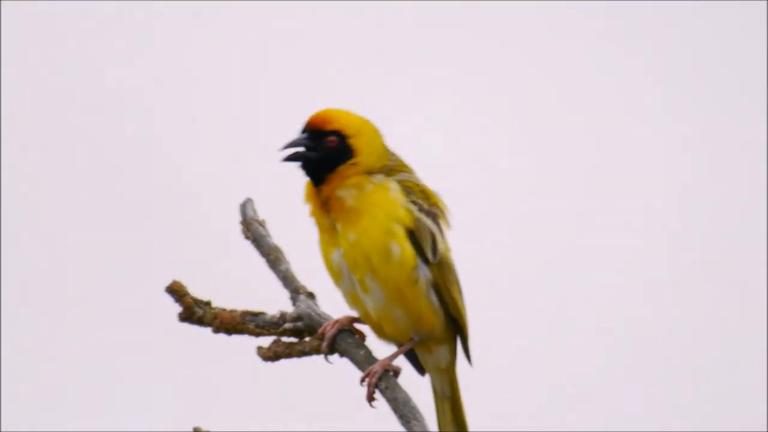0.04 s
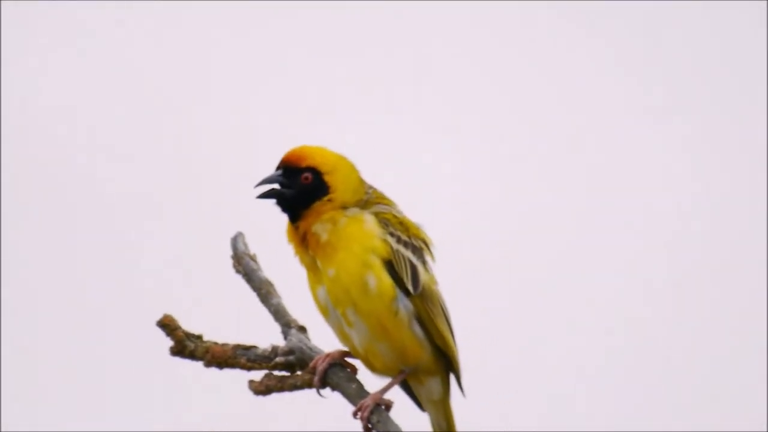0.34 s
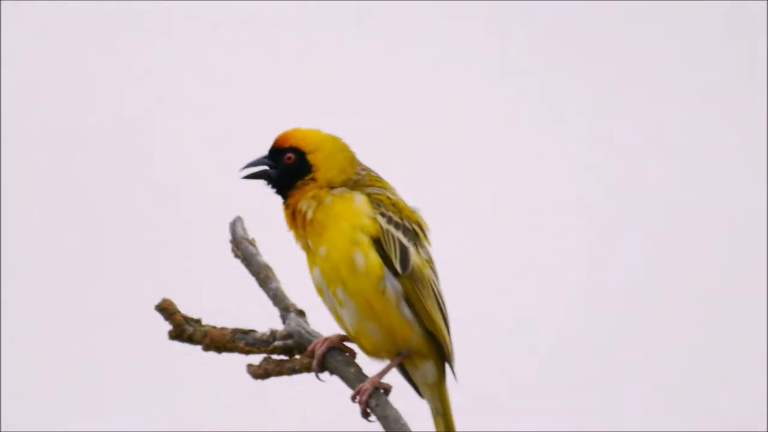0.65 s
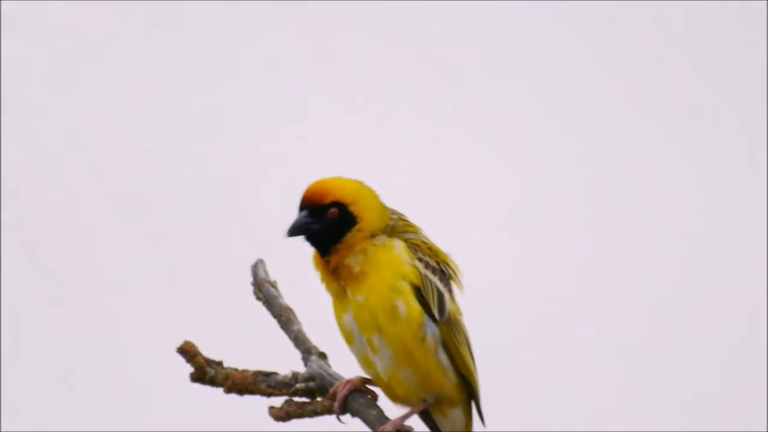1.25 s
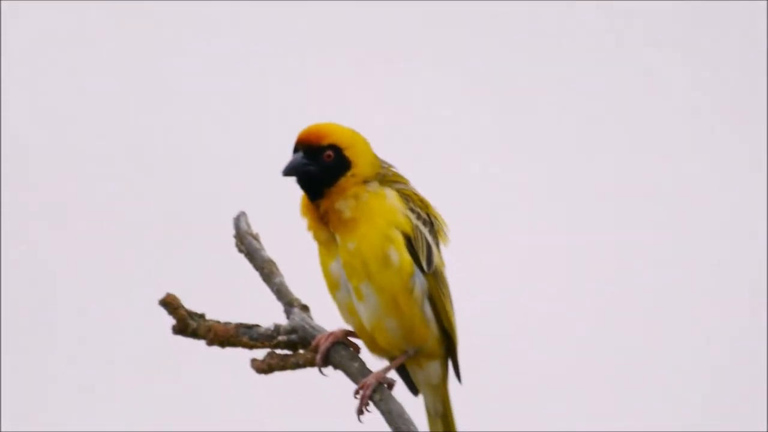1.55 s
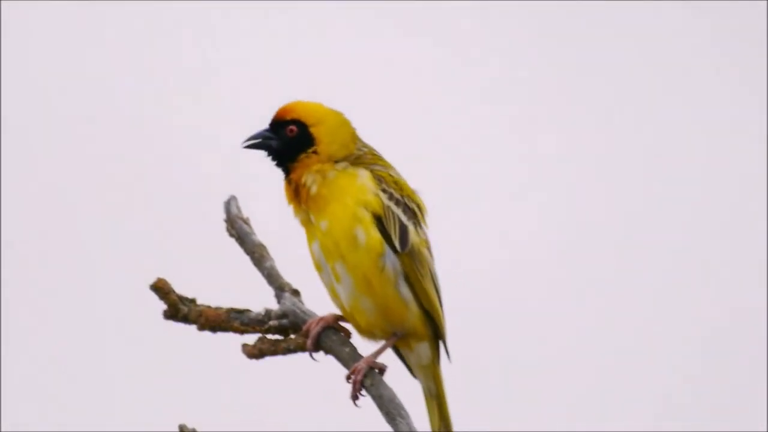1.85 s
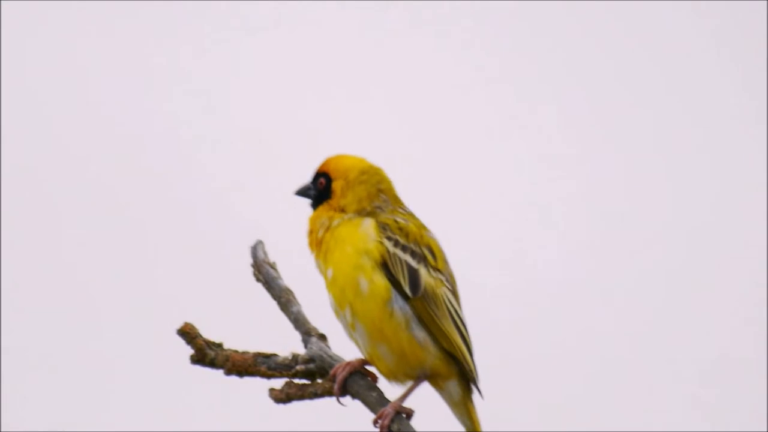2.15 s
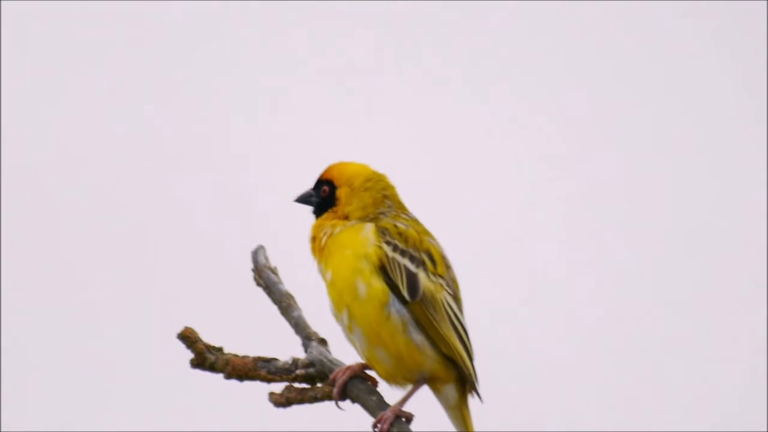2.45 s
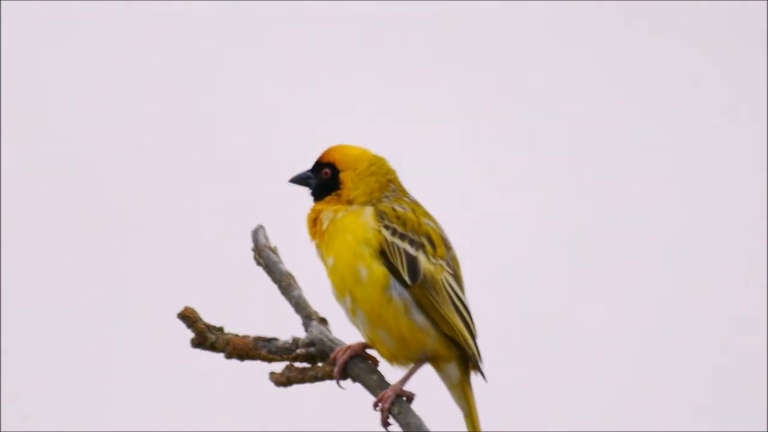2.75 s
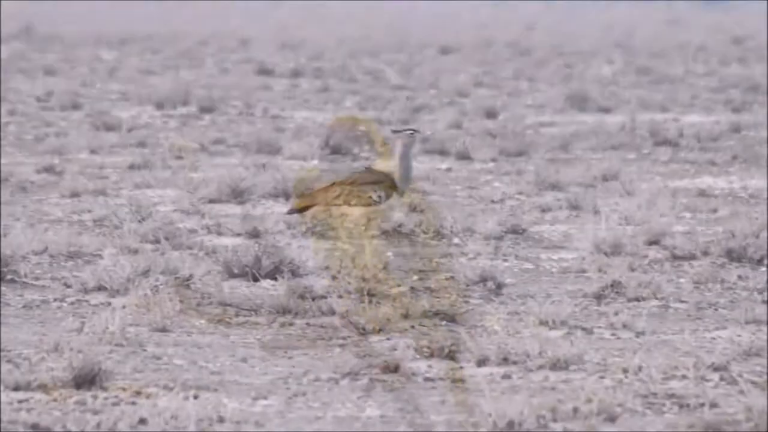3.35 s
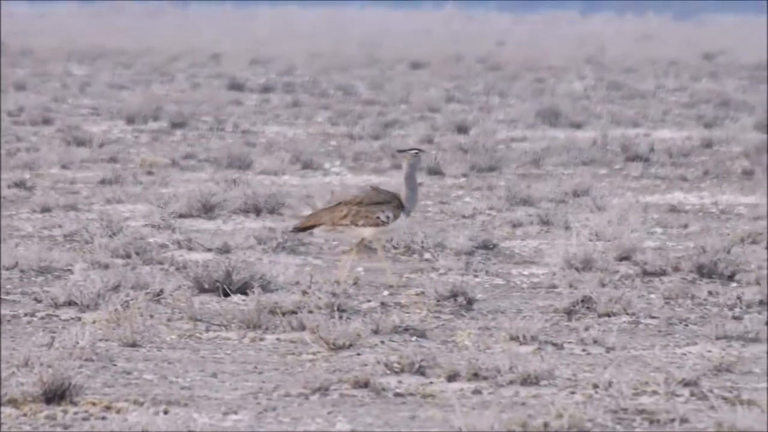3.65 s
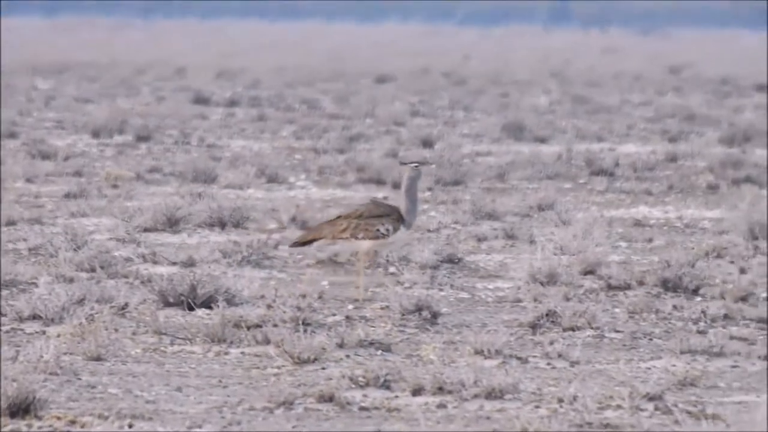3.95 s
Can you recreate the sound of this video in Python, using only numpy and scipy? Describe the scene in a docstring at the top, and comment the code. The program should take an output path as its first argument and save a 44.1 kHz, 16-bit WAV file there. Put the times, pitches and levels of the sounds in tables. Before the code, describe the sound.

Buzzy bird chatter gives way to dry ticks, with rumbling wind and faint distant whistles.

```python
"""On a bare branch in the wind, a small bird gives a fast buzzy chatter, then dry ticks in pairs.
Its rapid pitch sweeps and noise bursts ring in the throat and beak and scatter off ground and bushes.
The wind is a low, gusting rumble under a thin hiss. Further off, a second bird whistles three times
in nearly pure tones, with faint peeps. Near the end the scene cuts to a much quieter plain with a hum."""
import sys
import numpy as np
from scipy import signal
from scipy.fft import rfft, irfft
from scipy.io import wavfile
from scipy.ndimage import uniform_filter1d

SR = 44100
rng = np.random.default_rng(int(sys.argv[2]) if len(sys.argv) > 2 else 0)


def put_to_file(sound):
    """Save the sound as 16-bit audio at rate SR, in the file named by the first command-line argument."""
    columns = np.atleast_2d(sound).T  # one column per channel
    safe = np.clip(columns, -1, 1)
    whole_steps = np.round(safe * 32767)
    wavfile.write(sys.argv[1], SR, whole_steps.astype(np.int16))


N = 176400
TIME = np.arange(N) / SR
HZ = np.fft.rfftfreq(N, 1 / SR)
OCTAVE_DB = -21.5  # second harmonic of a sweep, relative to its fundamental


def amp(db):
    """Decibels to amplitude ratio."""
    return 10 ** (np.asarray(db) / 20)


def unit(x):
    """Normalisation to an rms of 1."""
    return x / np.sqrt(np.mean(x ** 2) + 1e-20)


def spectrum(points, hz):
    """Interpolation of a table on a log-frequency axis."""
    f, value = np.transpose(points)
    return np.interp(np.log(hz + 1), np.log(f + 1), value)


def curve(points, column=1):
    """Linear interpolation of a table along time."""
    rows = np.array(points)
    return np.interp(TIME, rows[:, 0], rows[:, column])


def add(mix, start_s, sound):
    """Superposition: a sound adds to the mix from start_s on."""
    at = round(start_s * SR)
    if at >= 0:
        part = mix[at:at + len(sound)]
        part += sound[:len(part)]


def panned(x, db):
    """Interaural level difference: the left rises and the right falls by db."""
    return x * np.array([amp(db), amp(-db)]).reshape(2, -1)


def filtered(x, colour):
    """Linear filtering: the spectrum of x is multiplied by a gain curve."""
    return irfft(rfft(x) * amp(spectrum(colour, HZ)), N)


def air(colour, coherence, patchy_db, flicker_db, size=1024):
    """Partially coherent stereo noise, with drifting spectral patches and a flicker common to all bands."""
    hz = np.fft.rfftfreq(size, 1 / SR)
    hop = size // 4
    a, b, c, d, patch = rng.standard_normal((5, N // hop + 6, len(hz)))
    patch = unit(uniform_filter1d(uniform_filter1d(patch, size=8, axis=0), size=8, axis=1))
    shared = np.clip(spectrum(coherence, hz), 0, .99)
    left = a + 1j * b
    right = shared * left + np.sqrt(1 - shared ** 2) * (c + 1j * d)
    frames = np.array([left, right]) * amp(patchy_db * patch)
    noise = signal.istft(frames.transpose(0, 2, 1), nperseg=size, noverlap=size - hop)[1][:, :N]
    flicker = unit(uniform_filter1d(uniform_filter1d(rng.standard_normal(N), size=700), size=400))
    return unit(filtered(noise * amp(flicker_db * flicker), colour))


def wind():
    """Amplitude-modulated noise in three bands: deep buffeting, a gusting rumble and a steadier rush."""
    # wind spectrum: (frequency [Hz], relative level [dB])
    colour = [(15, -64.5), (25, -32.5), (107, -3), (166, 0.5), (277, -7), (456, -23.5), (595, -23),
              (694, -27.5), (1060, -32), (1430, -44.5), (1840, -45), (2400, -62), (3120, -88), (5280, -120)]
    # likeness of the two channels: (frequency [Hz], coherence [0-1])
    coherence = [(25, 0.48), (70, 0.34), (180, 0.62), (550, 0.53), (1650, 0.37), (15000, .33)]
    # envelopes of the three bands: (time [s], level [dB])
    buffet_level = [(0.04, -35), (0.25, -54), (0.27, -37), (0.47, -49), (0.54, -40.5), (0.88, -48),
                    (0.89, -44), (2.0, -39.5), (2.02, -27.5), (2.05, -43.5), (2.5, -40), (3.25, -40),
                    (3.32, -36.5), (3.37, -45)]
    rumble_level = [(0.04, -33.5), (0.71, -34.5), (0.73, -29), (0.85, -34), (1.28, -29), (1.89, -32.5),
                    (2.01, -27.5), (2.05, -32), (2.09, -28.5), (2.7, -36), (2.72, -38.5), (3.17, -36),
                    (3.2, -31), (3.27, -37.5), (3.37, -31.5)]
    rush_level = [(0.05, -50), (.6, -52.5), (2.2, -53), (2.9, -52.5), (3.4, -52.5)]
    # side the rumble leans to: (time [s], left minus right [dB])
    balance = [(0.02, 6), (1.22, 2), (1.25, -4), (1.4, 5.5), (1.83, -8.5), (2.41, 7.5), (2.45, 3.5),
               (2.96, 10), (3.39, 7.5)]
    buffet_below_hz, rush_above_hz = 121.2, 479
    bins = rfft(air(colour, coherence, patchy_db=1.0, flicker_db=1.0))
    deep = 1 / (1 + (HZ / buffet_below_hz) ** 8)
    low = 1 / (1 + (HZ / rush_above_hz) ** 6)
    buffet = unit(irfft(bins * deep, N)) * amp(curve(buffet_level) + .5)
    rumble = unit(irfft(bins * (low - deep), N)) * amp(curve(rumble_level))
    rush = unit(irfft(bins * (1 - low), N)) * amp(curve(rush_level))
    lean_db = curve(balance) / 2
    return panned(buffet, .4 * lean_db) + panned(rumble, lean_db) + panned(rush, db=.9)


def hiss():
    """The thin treble of the wind: broadband noise whose low coherence makes it sound wide."""
    # hiss spectrum: (frequency [Hz], relative level [dB])
    colour = [(1200, -23), (2000, 4.5), (3500, 5.5), (4400, 1.5), (6000, -1), (10000, -0.5), (16000, -4.5)]
    # hiss envelope: (time [s], level [dB])
    level = [(0, -69.5), (2, -69.5), (2.8, -72.5), (3.05, -70), (3.4, -68)]
    return air(colour, coherence=[(2000, .14), (12000, .13)], patchy_db=1.2, flicker_db=.63) * amp(curve(level))


def sweep(mid_s, length_s, from_hz, to_hz, db, bend=1, soft=1.27, wobble=.042, octave_db=OCTAVE_DB):
    """Frequency modulation: an unsteady glide, fastest at first if bend < 1. Returns (start, sound)."""
    progress = np.linspace(0, 1, max(int(length_s * SR), 8))
    waver = unit(uniform_filter1d(rng.standard_normal(SR // 4), size=24))[:len(progress)]
    hz = from_hz * (to_hz / from_hz) ** (progress ** bend) * (1 + wobble * waver)
    phase = 2 * np.pi * (np.cumsum(hz) / SR + rng.random())
    tone = np.sin(phase) + amp(octave_db) * np.sin(2 * phase) * (2 * hz < SR / 2)
    envelope = abs(np.sin(np.pi * progress)) ** soft
    return mid_s - length_s / 2, amp(db) * envelope * tone


def chatter():
    """Pulses too fast to resolve fuse into a buzz around each syllable's up-sweep and down-sweep."""
    # down-sweep of each syllable: (time [s], level [dB], final pitch [Hz])
    syllables = [(0.0215, -46, 5190), (.069, -47, 5200), (0.1161, -48, 5200), (.1632, -48, 5200),
                 (.2102, -48, 5220), (0.2574, -48, 5100), (0.3052, -49, 5050), (0.3526, -48.5, 5010),
                 (0.401, -49.5, 5010), (0.4504, -50.5, 4840), (0.5003, -51.5, 4410), (0.551, -52.5, 4240),
                 (.604, -52.5, 4160), (.657, -53, 4010), (0.7103, -53.5, 4000), (.766, -56, 4100),
                 (.8093, -60, 4700)]
    # rising pulses around a down-sweep: (time offset [s], pitch [Hz], relative level [dB])
    pulses = [(-.018, 8240, -4.5), (-.0137, 7600, -4), (-.0096, 7000, -4), (.0036, 7800, -11),
              (.0075, 9440, -7.5), (.0118, 8900, -10), (.016, 8500, -7), (.0205, 9400, -10),
              (.025, 7800, -12)]
    # spectrum of the rasp: (frequency [Hz], relative level [dB])
    rasp_colour = [(1500, -28), (2400, -11), (3150, 0.5), (4000, -9), (4700, -2.5), (6000, -4), (8000, 1.5),
                   (9800, -2), (11000, -3), (12500, -5), (15000, -12)]
    pulse_s, glide_ratio, pulses_end_s = .003, 1.15, .812
    jitter_s, pitch_spread, spread_db = .0004, .035, 2.5
    rasp_db, rasp_decay_s = -9.5, .0016
    tones, puffs = np.zeros((2, N))
    puff = np.exp(-TIME[:SR // 50] / rasp_decay_s)
    for s, db, end_hz in syllables:
        # a deeper dive lasts longer and has a stronger octave
        first_end_hz = syllables[0][2]
        dive_hz = first_end_hz - end_hz
        dive_s = .0044 * (first_end_hz / end_hz) ** 1.4
        up_at = s - .0054
        add(tones, *sweep(up_at, length_s=.0038, from_hz=4920, to_hz=8060 + dive_hz, db=db))
        add(tones, *sweep(s, dive_s, from_hz=8000, to_hz=end_hz, db=db,
                          bend=.6, soft=1.15, octave_db=OCTAVE_DB + .0165 * dive_hz))
        for at in (up_at, s):
            add(puffs, at, amp(db) * puff)
        for offset_s, pulse_hz, pulse_db in pulses:
            late, sharp, loud = rng.standard_normal(3)
            if s + offset_s < pulses_end_s:
                at = s + offset_s + jitter_s * late
                hz = pulse_hz * (1 + pitch_spread * sharp)
                level_db = db + pulse_db + spread_db * loud
                add(tones, *sweep(at, pulse_s, hz / glide_ratio, hz * glide_ratio, level_db))
                add(puffs, at - rasp_decay_s / 2, amp(db) * puff)
    rasp = unit(filtered(rng.standard_normal(N), rasp_colour))
    return tones + amp(rasp_db) * puffs * rasp


def throat(x):
    """Source and filter: the resonances of throat and beak ring briefly after every pulse."""
    # response of throat and beak: (frequency [Hz], gain [dB])
    resonances = [(2600, -1), (3300, 1.5), (4000, -4.5), (4550, -0.5), (5100, -6.5), (5500, -4.5),
                  (5780, 4.5), (6170, -3.5), (6430, 1.5), (6780, -6.5), (7000, 0), (7500, -2.5), (8050, 3),
                  (8500, -0.5), (9800, 2.5), (10650, -4), (11400, -5), (11800, -18), (12400, -3),
                  (13400, -9)]
    log_gain = np.log(amp(spectrum(resonances, abs(np.fft.fftfreq(2048, 1 / SR)))))
    minimum_phase = np.exp(np.conj(signal.hilbert(log_gain)))
    ring = np.fft.ifft(minimum_phase).real
    return signal.oaconvolve(x, ring[:len(ring) // 2])[:N]


def echoes(x, db, t60_s):
    """Scattering from ground and bushes: sparse, decaying reflections, different at each ear."""
    t = TIME[:SR // 2]
    taps = rng.standard_normal((2, len(t))) * (rng.random((2, len(t))) < .1)
    taps *= amp(-60 * t / t60_s) * (t > .002)
    taps /= np.linalg.norm(taps, axis=1, keepdims=True)
    return amp(db) * signal.fftconvolve(x[None], taps, axes=1)[:, :N]


def ticks():
    """Broadband transients: dry two-millisecond noise bursts, mostly in weak-strong pairs."""
    # tick onsets: (time [s], relative level [dB])
    onsets = [(.914, -59), (.9174, -61), (.9238, -59), (0.927, -56), (.932, -58), (.9394, -63), (.942, -57),
              (.9473, -57), (1.1041, -54), (1.1318, -50), (1.252, -53), (1.2805, -49), (1.3779, -51),
              (1.405, -47.5), (1.501, -47.5), (1.5282, -47), (1.6, -48.5), (1.627, -45.5), (1.6978, -52.5),
              (1.7257, -51), (1.7963, -52.5), (1.8241, -52), (1.9108, -51), (3.712, -59.5)]
    # spectrum of a tick: (frequency [Hz], relative level [dB])
    colour = [(1500, -25), (3000, -6.5), (4000, -8), (5000, -1.5), (5800, -3), (7200, -2.5), (8400, -6),
              (10000, -5.5), (11500, -12.5), (15000, -11)]
    rise_s, hold_s, decay_s, gain_db = .00018, .0014, .0009, -3
    t = TIME[:SR // 50]
    burst = np.minimum(t / rise_s, 1) * np.exp(-np.maximum(t - hold_s, 0) / decay_s)
    envelope = np.zeros(N)
    for s, db in onsets:
        add(envelope, s, amp(db + gain_db) * burst)
    return envelope * unit(filtered(rng.standard_normal(N), colour))


def chips():
    """Two chirps, one rising and one falling, cross an octave so fast that they sound like sharp clicks."""
    # chirps: (centre time [s], duration [s], start pitch [Hz], end pitch [Hz], level [dB])
    notes = [(0.962, 0.0068, 5300, 11000, -45), (1.9118, 0.0067, 11700, 5050, -50.5)]
    out = np.zeros(N)
    for note in notes:
        add(out, *sweep(*note, bend=.6))
    return out


def whistles():
    """Two pure tones under slow frequency modulation: each scoops up, crests and sags."""
    # whistles: (start time [s], crest pitch [Hz], relative level [dB])
    notes = [(1.438, 3054, -66), (1.992, 2996, -68.5)]
    length_s, scoop_depth, scoop_s, crest_s, arch_hz = .195, .32, .014, .145, 150
    t = np.arange(0, length_s, 1 / SR)
    scoop = scoop_depth * np.exp(-t / scoop_s)
    sag_hz = arch_hz * (t / crest_s - 1) ** 2
    envelope = (.48 + np.sin(np.pi * t / length_s) ** 2.2) * signal.windows.tukey(len(t), .08)
    out = np.zeros(N)
    for s, crest_hz, db in notes:
        waver = .004 * unit(uniform_filter1d(rng.standard_normal(len(t)), size=400))
        hz = crest_hz * (1 - scoop + waver) - sag_hz
        add(out, s, amp(db) * envelope * np.sin(2 * np.pi * np.cumsum(hz) / SR))
    return out


def peeps():
    """Shallow upward frequency glides, heard as three faint peeps."""
    # peeps: (centre time [s], duration [s], start pitch [Hz], end pitch [Hz], level [dB])
    notes = [(1.85, 0.044, 3400, 3600, -72), (1.956, .09, 3350, 3710, -72), (2.091, 0.036, 4300, 4700, -75)]
    out = np.zeros(N)
    for note in notes:
        add(out, *sweep(*note, wobble=.025))
    return out


def slur():
    """The third whistle: a pure tone whose phase is the integral of a falling frequency."""
    # course of the note: (time [s], pitch [Hz], level [dB])
    contour = [(2.35, 3500, -88), (2.40, 3340, -71), (2.435, 3260, -61.5), (2.458, 3130, -58.5),
               (2.474, 3185, -55), (2.51, 2890, -65.5), (2.57, 2590, -71), (2.61, 2490, -83),
               (2.72, 2320, -82)]
    tone = np.sqrt(2) * np.sin(2 * np.pi * np.cumsum(curve(contour)) / SR)
    sounding = (TIME > contour[0][0]) & (TIME < contour[-1][0])
    return amp(curve(contour, column=2)) * tone * sounding


def calm():
    """Still air with a faint hum: narrow-band noise, which wavers as its components beat."""
    # spectrum of the still air: (frequency [Hz], relative level [dB])
    colour = [(18, -44), (30, -13), (102, -8.5), (243, -14), (369, -6), (492, -8), (575, -4), (767, -18.5),
              (1020, -19.5), (3230, -30), (3490, -26.5), (5740, -31), (8500, -29.5), (9680, -27.5),
              (15500, -31)]
    air_db, hum_db, hum_hz, half_width_hz = -65.5, -68, 580, 41
    band = 1 / (1 + ((HZ - hum_hz) / half_width_hz) ** 2)
    hums = unit(irfft(rfft(rng.standard_normal((3, N))) * band, N))
    hum = hums[0] + .17 * hums[1:]  # mostly common to both ears
    still_air = air(colour, coherence=[(300, .49), (8000, .066)], patchy_db=1.5, flicker_db=.5)
    return amp(air_db) * still_air + amp(hum_db) * hum


def scene():
    """Superposition of the near bird, the far calls, their echoes and wind that cuts abruptly to calm."""
    # colour of the near bird's echoes: (frequency [Hz], gain [dB])
    echo_colour = [(2000, 0.5), (4200, 2), (6800, -1), (10000, 2), (14000, 2)]
    near_t60_s, cut_s, fade_s = .15, 3.407, .00005
    song = throat(chatter() + ticks())
    sharp = throat(chips())
    reflected = echoes(song, db=-3, t60_s=near_t60_s) + echoes(sharp, db=-15, t60_s=near_t60_s)
    near = panned(song + sharp + filtered(reflected, echo_colour), db=1)
    calls = whistles() + peeps() + slur()
    far = panned(calls + echoes(calls, db=-9, t60_s=.14), db=5)
    before_cut = np.clip((cut_s - TIME) / fade_s, 0, 1)
    return near + far + before_cut * (wind() + hiss()) + (1 - before_cut) * calm()


def record(dry):
    """The microphone's frequency response: a narrow treble notch, then a low-pass band limit."""
    notch_hz, half_width_hz, depth, edge_hz = 9095, 356, .9, 15750
    notch = 1 - depth * np.exp(-abs((HZ - notch_hz) / half_width_hz) ** 3)
    notched = irfft(rfft(dry) * notch, N)
    low_pass = signal.firwin(511, edge_hz, window=("kaiser", 9), fs=SR)
    return signal.oaconvolve(notched, low_pass[None], "same")


dry = scene()
out = record(dry)
put_to_file(out)
```